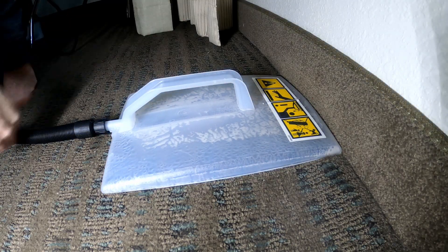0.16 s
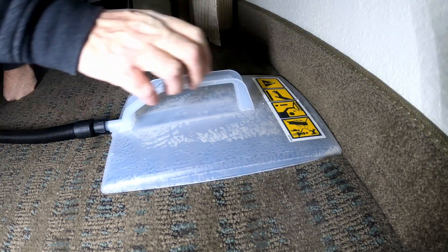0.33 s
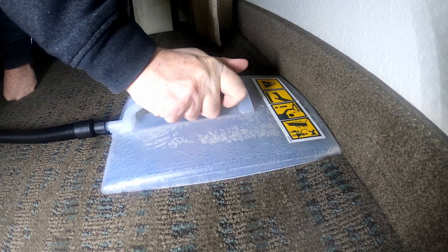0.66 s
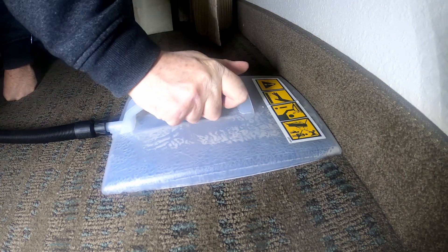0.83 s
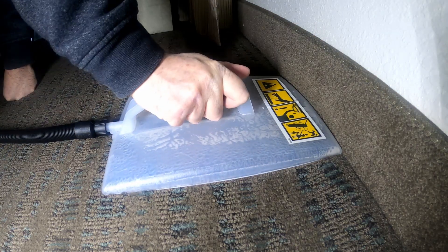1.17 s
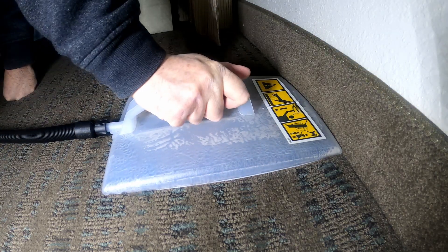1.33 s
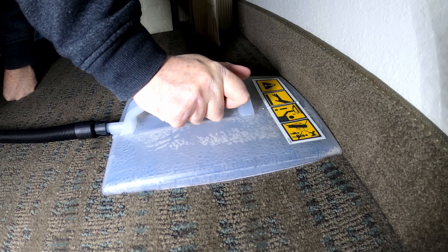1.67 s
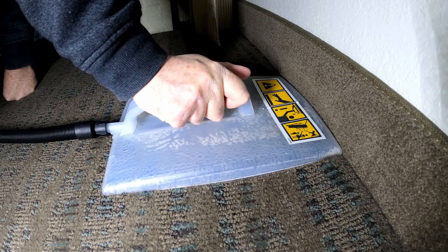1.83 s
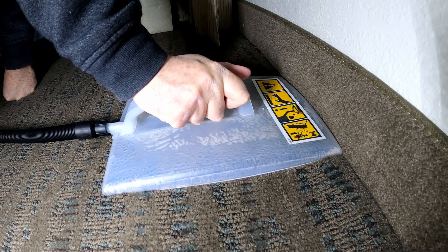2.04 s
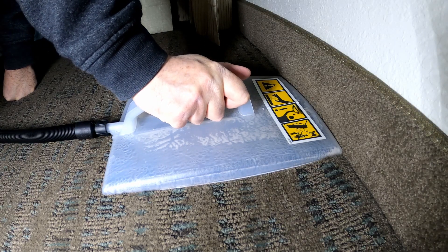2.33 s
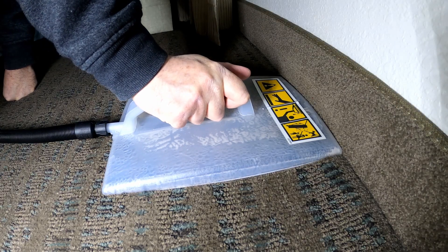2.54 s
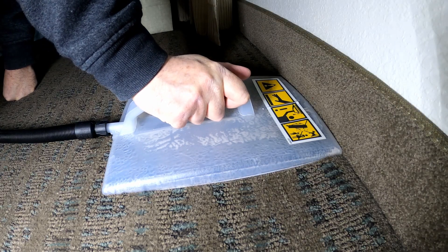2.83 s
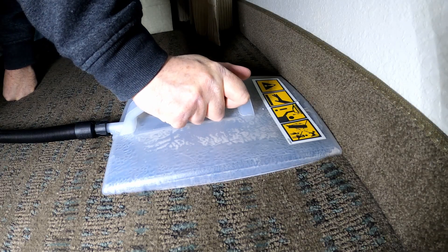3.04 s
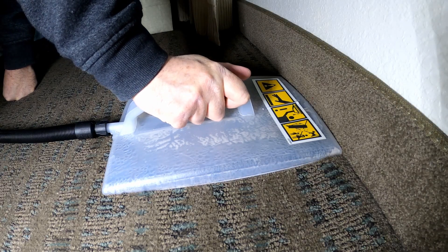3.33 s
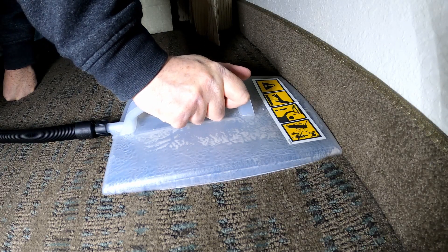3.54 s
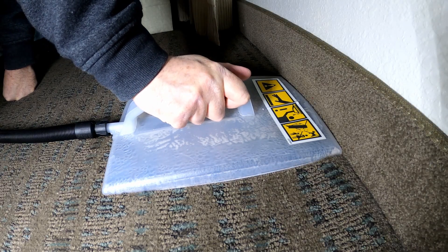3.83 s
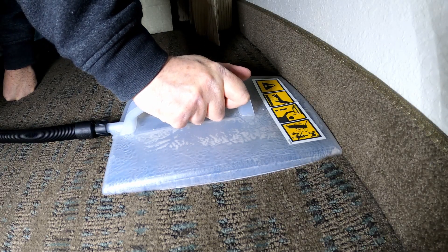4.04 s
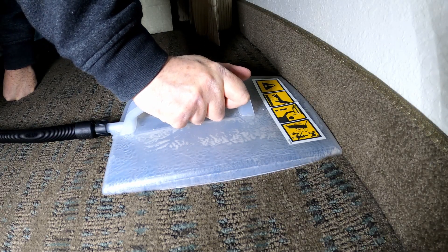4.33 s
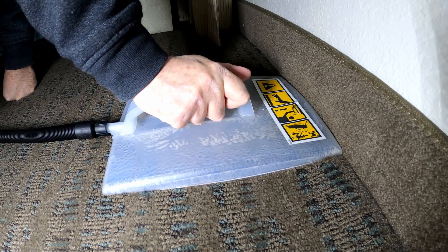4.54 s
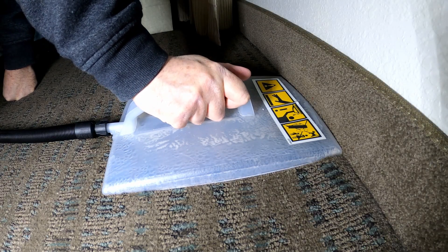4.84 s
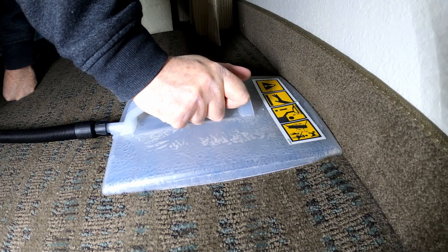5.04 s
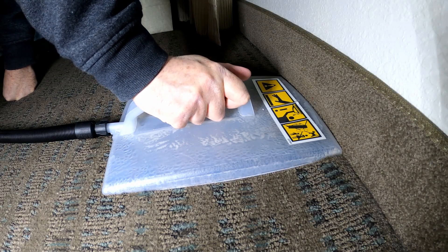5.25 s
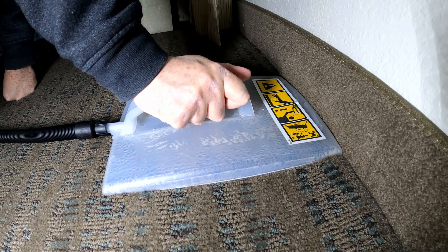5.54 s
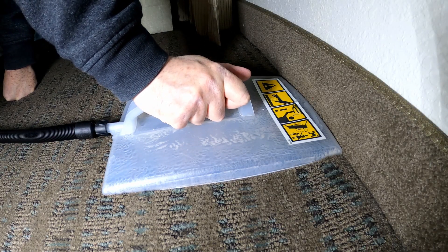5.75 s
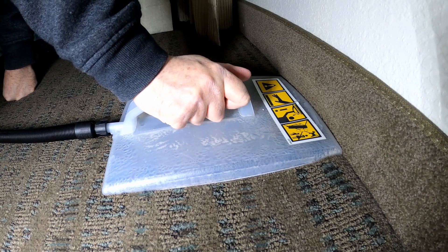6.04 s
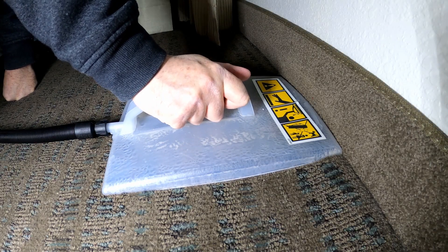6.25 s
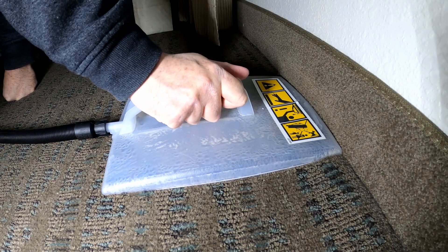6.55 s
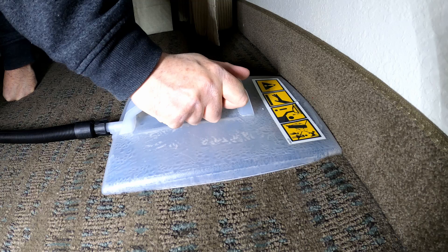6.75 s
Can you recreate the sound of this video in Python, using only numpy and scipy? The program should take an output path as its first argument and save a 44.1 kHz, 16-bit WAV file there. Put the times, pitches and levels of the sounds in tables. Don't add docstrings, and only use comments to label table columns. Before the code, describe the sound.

A vacuum machine drones steadily from a nearby room while air hisses through wet carpet, with early rustling, plastic taps and one heavy floor thump.

```python
import sys
import numpy as np
from scipy import signal
from scipy.fft import rfft, irfft, next_fast_len
from scipy.io import wavfile
from scipy.ndimage import uniform_filter1d

SR = 44100
rng = np.random.default_rng(int(sys.argv[2]) if len(sys.argv) > 2 else 0)


def persist_wave(psi):
    counts = np.round(np.clip(psi, -1, 1) * 32767).astype(np.int16)
    wavfile.write(sys.argv[1], SR, np.atleast_2d(counts).T)


def invert_db(level):
    return 10 ** (np.asarray(level, dtype=float) / 20)


N = 303849
STILL_DB = -60


def evened(x):
    return x / np.sqrt(np.mean(x ** 2) + 1e-20)


def read(points, hz):
    f, value = np.transpose(points)
    return np.interp(np.log(hz + 1), np.log(f + 1), value)


def drift(hz):
    return evened(signal.lfilter(*signal.butter(2, hz, fs=SR), rng.standard_normal(N)))


def pan(left_minus_right_db):
    return invert_db(left_minus_right_db * np.array([[.5], [-.5]]))


def ports(pair, gain, near_db=0):
    # (frequency [Hz], level below the whole [dB])
    unlike_part = [(25, -14.5), (60, -24), (100, -28), (180, -21.5), (320, -14), (560, -4.5), (860, -2.2),
                   (1200, -3.6), (2150, -2.1), (3100, -1.7), (4400, -.3), (9000, 1.5)]
    # (frequency [Hz], left minus right [dB])
    tilt_points = [(400, 0), (560, -2), (970, 4), (1700, 2), (2960, 5.5), (5160, 0), (9000, 1), (13000, -2)]
    # (frequency [Hz], phase [rad])
    lead_points = [(520, .15), (1200, -.3), (1720, -.55), (3010, -1), (4300, -.5), (5900, 2), (9000, 1)]
    size = next_fast_len(N)
    hz = np.fft.rfftfreq(size, 1 / SR)
    a, b = rfft(pair, size)
    unlike = np.minimum(invert_db(read(unlike_part, hz) - near_db), 1)
    phase = read([(20, 0.0063)] + lead_points, hz) * np.minimum(hz / 520, 1)
    right = (np.sqrt(1 - unlike ** 2) * a + unlike * b) * np.exp(-1j * phase)
    tilt = invert_db(read(tilt_points, hz) / 2 * np.minimum(hz / 500, 1) ** 4)
    spectra = np.array([a * tilt, right / tilt]) * gain(hz)
    return evened(irfft(spectra, size)[:, :N])


def patchy(x, depth_db):
    z = signal.stft(x, nperseg=512)[2]
    patches = rng.standard_normal(z.shape[1:])
    patches = uniform_filter1d(patches, size=7, axis=0)
    patches = uniform_filter1d(patches, size=5, axis=1)
    return signal.istft(z * invert_db(depth_db * evened(patches)), nperseg=512)[1][:, :N]


def hall(hz):
    # (frequency [Hz], density [dB per Hz])
    turbulence = [(15, -14.5), (45, -10), (130, -12.5), (170, -16), (300, -19.5), (500, -28.5),
                  (750, -39.5), (1200, -63.5), (2500, -87)]
    # (frequency [Hz], width [Hz], lift [dB])
    standing_waves = [(55, 12, 2.5), (72.3, 16.3, 11.5), (98.5, 13, 10), (118.86, 14.3, 11.5), (200, 25, 5),
                      (225.1, 22, 9), (242.7, 21, 11), (281.7, 14.7, 10.5), (310, 14, 4.5), (359, 28, 1.5),
                      (418, 24, 8), (468, 47, 4)]
    lift = sum(invert_db(2 * db) / (1 + (2 * (hz - f) / w) ** 2) ** 2 for f, w, db in standing_waves)
    return invert_db(read(turbulence, hz)) * np.sqrt(1 + lift)


def machine():
    # (time [s], low drone level [dB])
    motor_load = [(0, -6), (.3, -.5), (1, 1), (2, -1.5), (2.5, -.5), (3, -.5), (3.5, 1.5), (4.5, 1),
                  (5, .5), (5.5, -.5), (6, 1), (6.5, .5), (6.89, 2.5)]
    drone_db, upper_db, upper_share = -32, .4, .05
    drone = ports(rng.standard_normal((2, N)), hall)
    low = signal.sosfiltfilt(signal.butter(3, 160, fs=SR, output="sos"), drone)
    load_db = np.interp(np.arange(N) / SR, *np.transpose(motor_load))
    upper = (drone - low) * invert_db(upper_db + upper_share * load_db)
    return invert_db(drone_db) * (low * invert_db(load_db) + upper)


def hum():
    # (frequency [Hz], level [dB rms])
    tones = [(119.5, -45), (240, -50.5)]
    t = np.arange(N) / SR
    out = np.zeros(N)
    for hz, db in tones:
        level = invert_db(db + 2 + 1.5 * drift(3.5))
        out += level * np.sin(2 * np.pi * hz * t + 0.72 * drift(3.06))
    return out


def suction():
    # (frequency [Hz], density [dB per Hz])
    air = [(300, -32), (550, -4.5), (750, -10.5), (1080, -9), (1600, -8.5), (1880, -18), (2250, -15),
           (2900, -19.5), (3500, -22), (4200, -28), (4800, -27.5), (6000, -33), (7900, -36.5),
           (9500, -49.5)]
    air_db, sealed_db, leak_db, sealed_s = -54.5, 1.3, -5, 1.0
    flutter_db = 0.42 * drift(6) + 0.37 * drift(60)
    flow = patchy(rng.standard_normal((2, N)) * invert_db(flutter_db), depth_db=0.66)
    hiss = ports(flow, lambda hz: invert_db(read(air + [(16000, -76)], hz)))
    leak = np.maximum(1 - np.arange(N) / SR / sealed_s, 0)
    return invert_db(air_db + sealed_db + leak_db * leak) * hiss


def strokes(rows, lift_db, rest):
    # (time [s], level [dB])
    stir = [(0, -50), (.3, -50.5), (.66, -51.5), (.76, -57), (1, -63), (1.5, -66), (2.05, -72), (3.1, -74),
            (5.2, -71), (6.89, -72)]
    rest_db, stir_share = rest
    t = np.arange(0, N + 32, 32) / SR
    power = invert_db(2 * (rest_db + stir_share * (np.interp(t, *np.transpose(stir)) - STILL_DB)))
    for (s, db, rise, fall), lift in zip(rows, lift_db):
        away = np.maximum((s - t) / rise, (t - s) / fall)
        power = power + invert_db(2 * (db + lift - 20 * away))
    return np.interp(np.arange(N) / SR, t, np.sqrt(power))


def cloth(shape, level, per_s, spread_db, near_db):
    size_db = spread_db * np.minimum(rng.exponential(1, N), 4)
    slips = rng.standard_normal(N) * (rng.random(N) < per_s / SR) * invert_db(size_db)
    brush = rng.standard_normal((2, N)) * invert_db(1.3 * drift(48)) + 0.44 * evened(slips)
    return level * ports(brush, lambda hz: invert_db(read(shape, hz)), near_db)


def brushes():
    # (peak time [s], weave level [dB], rise [s per 20 dB], fall [s per 20 dB], loose fibres re weave [dB])
    brush_strokes = [(0, -56, .1, .3, -14), (.228, -49, .022, .16, -24), (.33, -58.5, .25, .35, -12),
                     (.413, -45, .004, .018, -13), (.432, -44, .028, .008, -12),
                     (.537, -51.5, .022, .25, -11), (.64, -62, .3, .08, -14), (.72, -60, .05, .08, -12),
                     (.92, -64, .12, .13, -7), (1.05, -67, .3, .2, -9), (1.126, -56, .012, .1, -16),
                     (1.147, -55, .05, .1, -10), (1.35, -66, .3, .3, -10), (1.58, -65, .16, .1, -10),
                     (1.78, -72, .4, .3, -16), (1.834, -59, .05, .07, -19), (2.42, -73, .4, .5, -8),
                     (2.58, -73, .3, .3, -18), (2.87, -71, .7, .4, -15), (5.4, -72, .25, .3, -13),
                     (6.068, -66, .06, .3, -11), (6.3, -76, .4, .5, -14), (6.62, -71, .5, 2.5, -12)]
    # (frequency [Hz], density [dB per Hz])
    weave_shape = [(1200, -24), (2200, -8), (3500, -3), (5000, -1.5), (6200, -8), (8000, -14.5),
                   (11000, -34.5), (16000, -58)]
    # (frequency [Hz], density [dB per Hz])
    fibre_shape = [(3000, -24.5), (6000, -4), (8000, 1.5), (9500, -8.5), (12500, -13.5), (14500, -21),
                   (16000, -43)]
    rows = np.array(brush_strokes)
    light, fibre_db = rows[:, :4], rows[:, 4]
    # (level on a still body [dB], share of the stir)
    weave_level = strokes(light, 0 * fibre_db, rest=(-74, .7))
    weave = cloth(weave_shape, weave_level, per_s=3500, spread_db=2.5, near_db=0.4)
    fibre_level = strokes(light, fibre_db, rest=(-87, 1))
    fibres = cloth(fibre_shape, fibre_level, per_s=2500, spread_db=4.5, near_db=0.3)
    return weave + fibres * pan(-3.5)


def folds():
    # (peak time [s], level [dB], rise [s per 20 dB], fall [s per 20 dB])
    presses = [(.24, -49.5, .08, .15), (.433, -46, .04, .015), (.54, -50, .05, .2), (.92, -64, .15, .15),
               (1.105, -60, .15, .1), (1.13, -40, .008, .16), (1.2, -56, .15, .11), (1.37, -61, .12, .15),
               (1.58, -62, .2, .15), (1.84, -49.5, .045, .09), (2.3, -56.5, .35, .7), (2.53, -60, .5, .2),
               (2.585, -51.5, .035, .13), (2.87, -59.5, .8, .33), (5.4, -69, .5, .5), (6.3, -61.5, .6, .4),
               (6.62, -58, .3, 1.5)]
    # (frequency [Hz], density [dB per Hz])
    fold_shape = [(300, -30.5), (600, -8.5), (1100, 0), (1700, -2), (2400, -4), (3200, -8.5), (5000, -22.5),
                  (14000, -60.5)]
    level = strokes(presses, np.zeros(len(presses)), rest=(STILL_DB, 1))
    return cloth(fold_shape, level, per_s=1500, spread_db=3.0, near_db=1.8)


def bursts(rows):
    t, out = np.arange(4096) / SR, np.zeros((2, N + 4096))
    hz = np.fft.rfftfreq(4096, 1 / SR)
    for s, db, pitch_hz, octaves, t60 in rows:
        a, b = rng.standard_normal((2, 4096))
        colour = np.exp(-.5 * (np.log2((hz + 1) / pitch_hz) / octaves) ** 2) / (1 + (hz / 15000) ** 16)
        burst = irfft(rfft([a, .3 * a + .9 * b]) * colour)
        burst = burst * invert_db(-60 * t / t60) * np.minimum(t / 0.0018, 1)
        start = round(s * SR)
        out[:, start:start + 4096] += invert_db(db) * pan(-1.5) * burst / abs(burst).max()
    return out[:, :N]


def squeaks():
    # (time [s], peak level [dB], pitch [Hz], width [octaves], t60 [s])
    drags = [(.008, -42, 1480, .06, .25), (.05, -46, 1080, .06, .1), (.08, -46, 1720, .05, .2),
             (.143, -42, 1550, .12, .25), (.205, -45, 1700, .06, .12), (.22, -43, 1150, .07, .25),
             (.222, -52, 5100, .08, .3), (.411, -36, 4700, .12, .03), (.411, -42, 2290, .05, .2),
             (.416, -44, 4600, .1, .06), (.418, -48, 8080, .04, .06), (.428, -37, 4400, .1, .03),
             (.426, -47, 7900, .2, .04), (.535, -54, 5200, .1, .3), (.56, -47, 2150, .06, .2),
             (1.124, -38, 1030, .05, .2), (1.128, -40, 1700, .06, .2), (1.13, -46, 3900, .05, .2),
             (1.14, -40, 2300, .05, .3), (1.145, -50, 5000, .05, .12), (1.17, -46, 1000, .06, .3),
             (.4112, -43, 7600, .2, .015), (.412, -36, 650, .4, .04), (.428, -35, 600, .4, .05)]
    return bursts(drags)


def snaps():
    # (time [s], peak level [dB], pitch [Hz])
    threads = [(.386, -56.5, 12500), (.646, -62, 14000), (1.57, -83, 12000), (1.7, -71, 12200),
               (2.31, -76, 12000), (2.699, -62.5, 13200), (3.125, -73, 13000), (3.63, -72.5, 13000),
               (5.47, -78, 12000), (6.065, -76, 13000), (6.41, -78, 12000), (1.331, -78, 11000),
               (4.422, -76, 13000), (5.598, -82, 11000), (5.877, -85, 11000), (6.778, -84, 12500)]
    octaves, t60 = .36, .008
    return bursts([(s, db, pitch_hz, octaves, t60) for s, db, pitch_hz in threads])


def handle():
    # (frequency [Hz], level [dB], t60 [s])
    modes = [(315, -5, 0.088), (534, 1.5, 0.025), (940, -6, 0.023), (1260, -4.5, 0.0097), (1670, -2, 0.017),
             (2280, 1, 0.012), (3470, 1.5, .011), (4120, -0.5, 0.017), (4920, 0.5, .018), (5700, -6, .011),
             (6200, -24, 0.0088), (8100, -13, .012), (11500, -15, .01)]
    # (time [s], peak level [dB], struck pitch [Hz], width [octaves], left minus right [dB])
    taps = [(.4113, -27.5, 4800, .45, -1), (0.412, -31.5, 600, 1.3, 0), (.4275, -28, 500, 1.2, -5),
            (0.4315, -33, 4200, 1.3, -5), (0.6028, -28.5, 600, 0.95, -4.5), (.6786, -21, 3300, 0.65, -4),
            (.6799, -28, 3000, 1.0, -7), (.679, -23.5, 550, 0.77, -3), (.903, -48, 5000, .9, -1),
            (1.123, -28.5, 900, 0.92, 3), (1.128, -25.5, 380, 0.37, -4), (1.362, -31, 600, 0.91, -2),
            (2.577, -39, 1500, 0.6, 0), (3.193, -33.5, 800, 0.7, 0), (5.158, -37, 800, 0.62, 0),
            (6.193, -31.5, 900, 0.79, 3), (6.262, -48, 3000, .9, 0)]
    t, out = np.arange(4096) / SR, np.zeros((2, N + 4096))
    hz, mode_db, t60 = np.transpose(modes)[:, :, None]
    for s, db, pitch_hz, octaves, pan_db in taps:
        share = invert_db(mode_db) * np.exp(-.5 * (np.log2(hz / pitch_hz) / octaves) ** 2)
        detune = 1 + 0.027 * rng.standard_normal((2, 1, 1))
        ring = (share * invert_db(-60 * t / t60) * np.sin(2 * np.pi * hz * detune * t)).sum(axis=1)
        ring = signal.lfilter(*signal.butter(4, 7200, fs=SR), ring)
        start = round(s * SR)
        out[:, start:start + 4096] += invert_db(db) * pan(pan_db) * ring / abs(ring).max()
    return out[:, :N]


def boards(loads):
    t, out = np.arange(SR) / SR, np.zeros(N + SR)
    for s, db, board_hz, rise, hold, t60 in loads:
        push = np.sin(np.pi / 2 * np.minimum(t / rise, 1)) ** 2
        decay = invert_db(-60 * np.maximum(t - rise - hold, 0) / t60)
        start = round(s * SR)
        out[start:start + SR] += invert_db(db) * push * decay * np.cos(2 * np.pi * board_hz * (t - rise))
    return out[:N] * pan(.45)


def thuds():
    # (time [s], peak level [dB], board mode [Hz], rise [s], t60 [s])
    landings = [(.638, -21.5, 70, .015, .28), (1.127, -8.3, 88, .016, .066), (1.132, -33, 250, .008, .14),
                (1.155, -16.5, 71, .0276, .13), (1.183, -19, 71, .028, .075), (1.194, -28, 150, .015, .12),
                (1.327, -26, 84, .017, .78), (1.42, -27, 85, .035, .45), (1.56, -25, 72, .03, .3),
                (1.59, -24, 50, .028, .3), (1.715, -16, 53, .044, .36), (1.785, -26, 46, .03, .3),
                (1.818, -21, 58, .02, .25), (1.853, -28, 48, .025, .6)]
    hold_share = .2
    return boards([(s, db, hz, rise, hold_share * rise, t60) for s, db, hz, rise, t60 in landings])


def scuffs():
    # (time [s], peak level [dB], pitch [Hz], width [octaves], t60 [s])
    slides = [
        (4.35, -80, 11500, .3, .05),
        (1.826, -43.5, 2600, .4, .16),
        (2.574, -44.5, 2600, .3, .18),
        (1.127, -41, 2200, 0.31, .2),
        (2.572, -41.5, 1200, .2, .12),
        (2.575, -47, 3600, .1, .06),
        (2.62, -46, 1500, .2, .1),
    ]
    return bursts(slides)


def footsteps():
    # (time [s], peak level [dB], board mode [Hz], t60 [s])
    treads = [
        (2.445, -28, 33, .46),
        (3.63, -30.5, 31, .5),
        (3.663, -27.5, 16, .64),
        (4.324, -29, 30, .4),
        (4.344, -22, 23.7, .17),
        (4.978, -24.5, 28, .34),
        (4.982, -26, 20, .31),
        (5.592, -30, 27.5, .31),
        (5.617, -25, 32, .55),
        (6.762, -25.5, 30, .43),
    ]
    rise_s, hold_s = .075, .01
    return boards([(s, db, hz, rise_s, hold_s, t60) for s, db, hz, t60 in treads])


def scene():
    room = machine() + hum() + suction()
    rustle = patchy(brushes() + folds(), depth_db=1.7)
    contacts = squeaks() + snaps() + handle() + scuffs()
    return room + rustle + contacts + thuds() + footsteps()


def blank(x):
    # (frequency [Hz], threshold [dB per bin])
    threshold = [(8500, -130), (9300, -114), (10500, -113), (13000, -112), (15500, -109)]
    padded = np.pad(x, ((0, 0), (0, 1024)), "reflect")
    hz, _, z = signal.stft(padded, SR, nperseg=1024, boundary="even")
    power = (abs(z) ** 2).mean(0)
    power = uniform_filter1d(power, size=16, axis=0)[8::16].repeat(16, axis=0)
    keep = np.zeros(z.shape[1:])
    keep[:512] = power > invert_db(2 * read(threshold, hz[8::16])).repeat(16)[:, None]
    return signal.istft(z * keep, SR, nperseg=1024)[1][:, :N]


def roll_off(x):
    return signal.sosfilt(signal.butter(12, 15700, fs=SR, output="sos"), x)


def record(dry):
    fade_in = np.minimum(np.arange(N) / SR / .0012, 1)
    hiss = invert_db(-104) * rng.standard_normal(dry.shape)
    return roll_off(blank(dry) * fade_in + hiss)


dry = scene()
out = record(dry)
persist_wave(out)
```